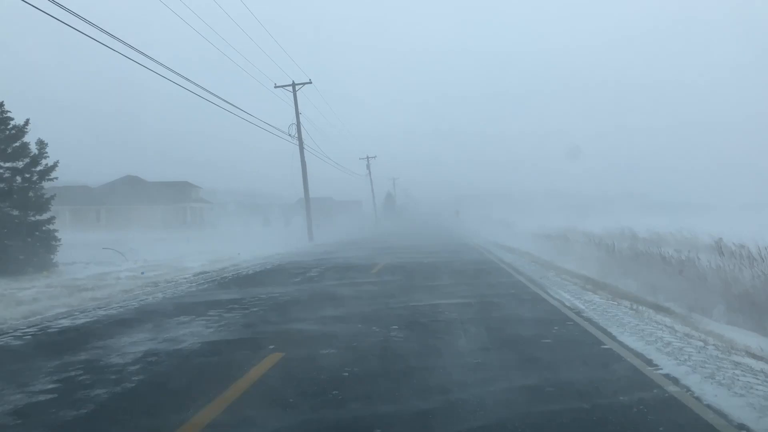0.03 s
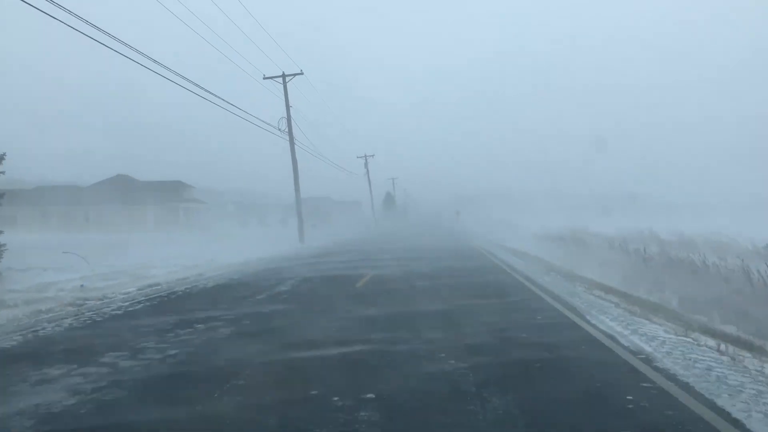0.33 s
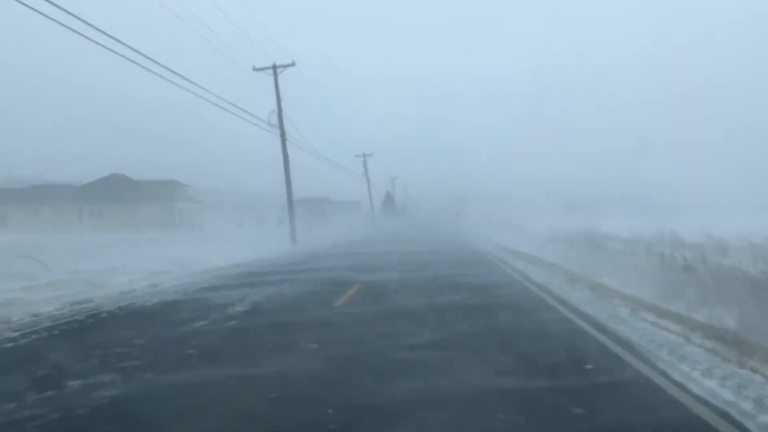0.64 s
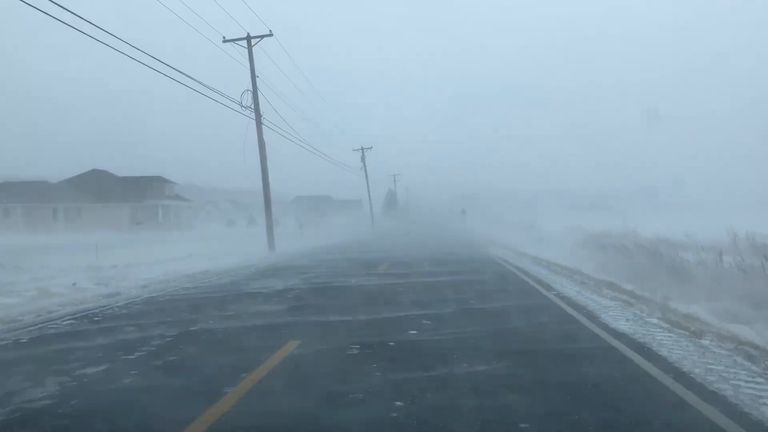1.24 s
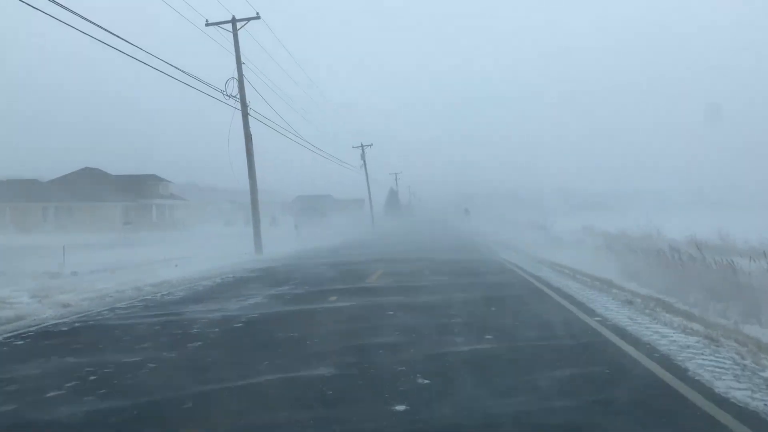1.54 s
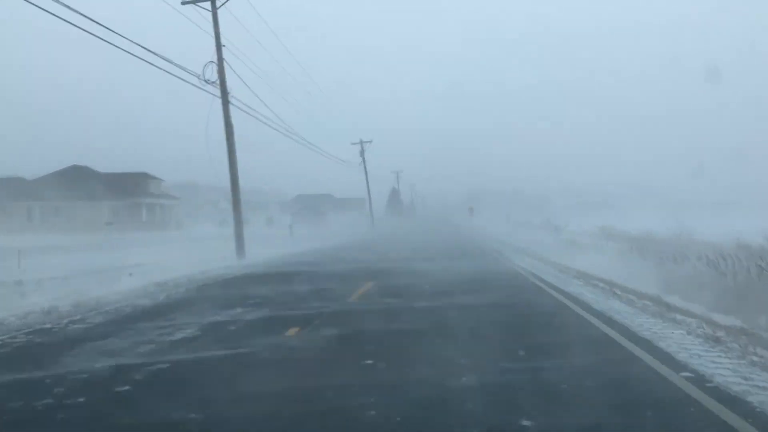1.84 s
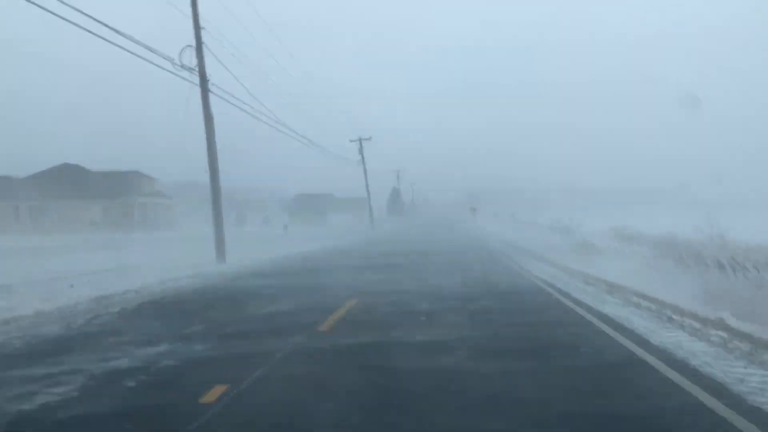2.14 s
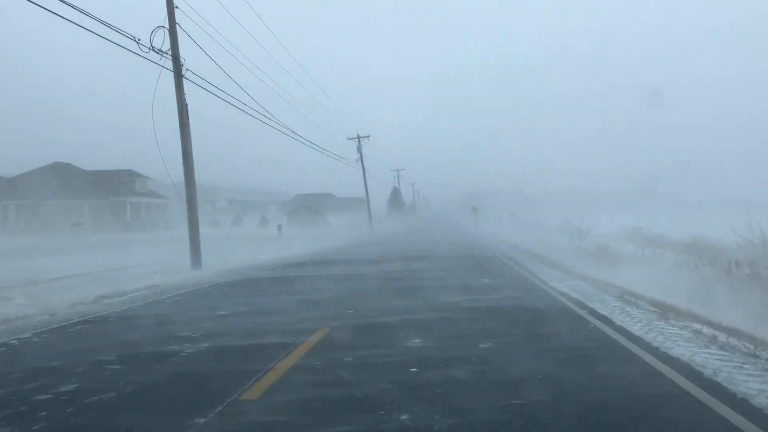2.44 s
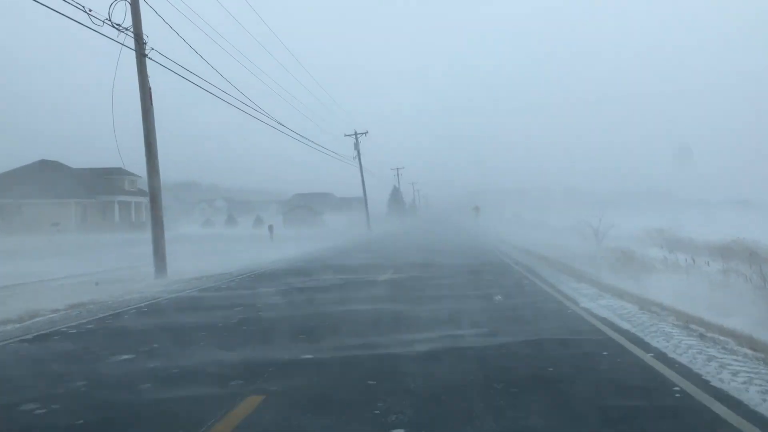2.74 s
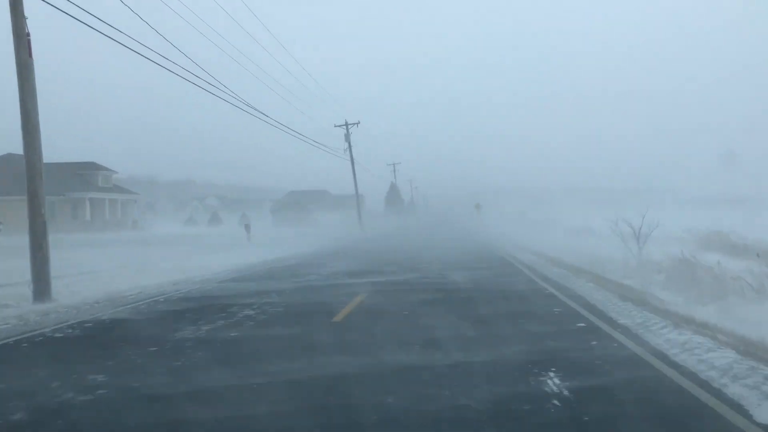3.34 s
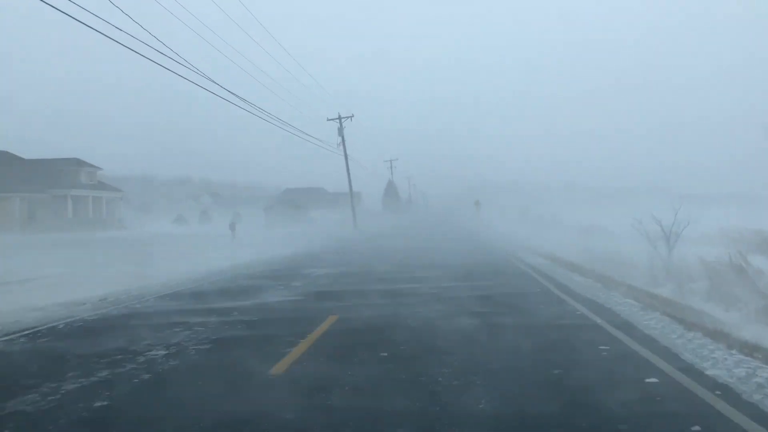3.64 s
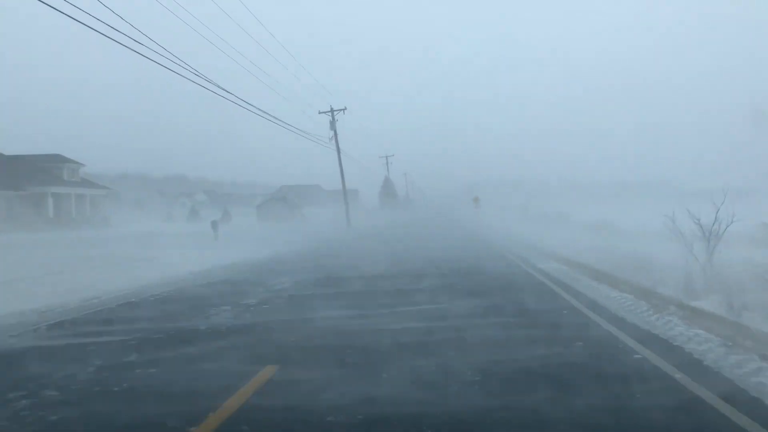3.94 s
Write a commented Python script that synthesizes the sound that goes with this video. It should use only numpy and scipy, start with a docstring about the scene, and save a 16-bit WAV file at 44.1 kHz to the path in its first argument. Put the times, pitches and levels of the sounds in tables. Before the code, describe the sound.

A steady low rumble of tyres and engine fills a moving car's cabin for four seconds, with wind hissing slightly to the right. From about 1.5 to 2.1 seconds the rumble swells and several dull thuds pass through the body. A loose part chatters in short scratchy bursts between 1.2 and 3 seconds. A faint, high whistle of air rises near 1.2 and 3 seconds.

```python
"""Car cabin on a snowy, windy road

Inside a car at steady speed, the cabin's lowest resonance booms with the engine under the tyre rumble. Air from
a vent hisses from the right, with a faint whistle of air at a gap. Midway a rough stretch swells the rumble,
ridges thud through the body, and a loose part chatters in short scratchy bursts."""
import sys
import numpy as np
from scipy import signal
from scipy.fft import rfft, irfft
from scipy.io import wavfile
from scipy.ndimage import uniform_filter1d

SR = 44100
rng = np.random.default_rng(int(sys.argv[2]) if len(sys.argv) > 2 else 0)


def wav_out(sig):
    """Save sig, one row per channel (or a flat mono array), as 16-bit PCM at SR to the path in sys.argv[1]."""
    wavfile.write(sys.argv[1], SR, np.round(np.clip(np.atleast_2d(sig).T, -1, 1) * 32767).astype(np.int16))


N = 176400
TIME_S, FREQ_HZ = np.arange(N) / SR, np.fft.rfftfreq(N, 1 / SR)
LEFT_LAG_S = .000268


# Tyre rumble in the cabin (frequency [Hz], density [dB/Hz])
RUMBLE_SPECTRUM = [(20, -70), (34, -61), (58, -35), (75, -38.5), (98, -41.5), (118, -40.5), (140, -47),
                   (160, -41.5), (200, -41.5), (235, -47), (290, -51), (350, -49.5), (470, -55),
                   (585, -54.5), (640, -62.5), (810, -61.5), (890, -65), (1400, -70), (1510, -75.5),
                   (1780, -82.5), (2600, -90), (6000, -120)]
# Tread and cabin resonances (centre [Hz], width [Hz], gain [dB])
RUMBLE_PEAKS = [(770, 56, 3), (1352, 144, 3), (1629, 84, 6.5), (1990, 70, 7)]
# Likeness at the two ears (frequency [Hz], coherence [0-1])
RUMBLE_COHERENCE = [(40, 1), (95, 0.81), (200, 0.91), (420, 0.87), (560, 0.62), (700, 0.47), (1500, 0.13)]
# Phase between the ears (frequency [Hz], left lead [rad])
RUMBLE_PHASE = [(30, -0.52), (330, 0.03), (570, -0.04), (760, -0.13), (900, -2.5), (1800, -2)]
# Road surface (time [s], roughness [dB])
ROUGHNESS = [(0, 0.8), (.7, -1.5), (1.48, 0), (1.6, 0), (1.78, 3.5), (1.95, 2), (2.02, 5.5), (2.14, 5),
             (2.2, -6), (2.3, 3), (2.6, 0), (2.8, -3), (3.0, 1), (3.3, 0), (3.6, -2.5), (4, 2)]
# Coupling of roughness to rumble level (frequency [Hz], share [0-1])
ROUGHNESS_SHARE = [(30, 0.99), (60, 0.69), (110, 0.77), (180, 0.21), (300, 0), (1500, 0.078)]

def tyre_rumble():
    """Tyres roll over the road; the bass swells where the surface is rough."""
    density_db = over_hz(RUMBLE_SPECTRUM, FREQ_HZ) + resonances_db(RUMBLE_PEAKS)
    rumble = ear_noise(density_db, over_hz(RUMBLE_COHERENCE, FREQ_HZ), over_hz(RUMBLE_PHASE, FREQ_HZ))
    return modulate(rumble, lambda hz, t: over_hz(ROUGHNESS_SHARE, hz) * over_time(ROUGHNESS, t),
                    patch_db=.93, flutter_db=.5)


def cabin_boom(centre_hz=45.4, width_hz=8.5):
    """The road shakes the cabin's lowest air resonance."""
    level_db = -23 + .26 * over_time(ROUGHNESS, TIME_S)
    return amp(level_db) * narrow_noise(N, centre_hz, width_hz)


def engine_drone(mean_hz=41.4, wander_hz=.86, rms_db=-20.5):
    """The engine hums one low, slightly wandering tone."""
    pitch_hz = mean_hz + wander_hz * drift((N,), cells=(7000,))
    return amp(rms_db) * np.sqrt(2) * np.sin(2 * np.pi * np.cumsum(pitch_hz) / SR)


# Ridges in the road (time [s], level [dB])
RIDGES = [(1.561, -19), (1.773, -16), (1.993, -9), (2.046, -11.5), (2.087, -16)]
# Low modes of the car body (frequency [Hz], level [dB], T60 [s])
BODY_MODES = [(57, -2, 0.17), (79, -2, 0.12), (120, -0.5, .08), (166, -6.5, 0.063)]

def body_thuds(size=8192):
    """Each ridge shoves the tyres and rings the body's low modes."""
    t, out = np.arange(size) / SR, np.zeros((2, N))
    thud = sum(amp(db - 60 * t / t60_s) * np.sin(2 * np.pi * hz * t) for hz, db, t60_s in BODY_MODES)
    for start_s, level_db in RIDGES:
        add(out, start_s, -amp(level_db) * np.array([thud, thud]))
    return out


# Rushing air (frequency [Hz], density [dB/Hz])
HISS_SPECTRUM = [(600, -105), (2000, -82), (2400, -78), (2900, -80), (3600, -82), (4800, -85.5),
                 (5300, -89.5), (6100, -85), (7000, -85), (8400, -93.5), (9300, -89.5), (11200, -94.5),
                 (12600, -95.5), (13800, -101), (15000, -101), (16000, -106)]
# Faint resonances (centre [Hz], width [Hz], gain [dB])
HISS_PEAKS = [(2380, 98, 3.5), (3140, 60, 4.5), (3560, 43, -1), (6700, 180, 2.5)]
# Share arriving by the direct path (frequency [Hz], coherence [0-1])
HISS_COHERENCE = [(2000, 0), (3000, 0), (3900, 0.14), (5200, 0), (6800, 0.56), (8300, 1), (9200, 1),
                  (10300, 0.67), (12500, 0.7), (13800, 1), (15000, 0)]
# Hiss envelope (time [s], gain [dB])
HISS_GAIN = [(0, 1), (.7, -1), (1.2, -0.3), (1.9, 0), (2.4, -0.8), (2.9, -1.5), (4, -1.2)]

def air_hiss():
    """Rushing air reaches the right ear first; cabin reflections ripple its spectrum."""
    ripple_db = 1.42 * drift((2, len(FREQ_HZ)), cells=(1, 300))
    density_db = over_hz(HISS_SPECTRUM, FREQ_HZ) + ripple_db + resonances_db(HISS_PEAKS)
    hiss = ear_noise(density_db, over_hz(HISS_COHERENCE, FREQ_HZ), -2 * np.pi * FREQ_HZ * LEFT_LAG_S)
    return modulate(hiss, lambda hz, t: over_time(HISS_GAIN, t), patch_db=1.1, flutter_db=.28)


# Chatter (time [s], hold [s], gain [dB], tilt [dB/octave], ring [Hz], ring width [Hz], ring gain [dB])
RATTLE_BURSTS = [(1.197, .009, -13, 8, 11000, 900, 3), (1.275, 0.011, -11, 0, 4900, 460, 3),
                 (1.558, 0.018, -6.5, -2, 2700, 900, 4.5), (1.644, .012, -16, 6, 14500, 900, 4),
                 (1.693, .007, -10, 6, 11000, 900, 3), (1.731, 0.012, -4, 2, 11500, 1200, 3),
                 (1.863, 0.009, -1.5, 3.8, 2150, 560, 15), (1.889, 0.017, -6, 1, 4400, 900, 2),
                 (1.919, 0.0073, -3.5, 1.5, 4400, 900, 1), (1.931, 0.0018, 3.5, 3.5, 13500, 1500, 2),
                 (1.94, 0.012, -14, -2, 4900, 460, 2), (2.132, 0.011, -6.5, -2, 4970, 460, 8),
                 (2.224, 0.0067, -12.5, -1, 3400, 600, 12), (2.276, .01, -12, 2, 11000, 900, 4),
                 (2.346, 0.0057, -8, 5, 11200, 900, 6), (2.435, 0.0074, -8.5, 1, 4400, 1100, 11.5),
                 (2.526, .018, -13, -1, 4000, 460, 2), (2.59, 0.009, -4.5, 5.5, 6500, 900, 5),
                 (3.009, 0.013, -7, -3.5, 2600, 900, 1.5), (3.025, .005, -8, -1, 3000, 1200, 8)]
# Base colour of the loose part (frequency [Hz], density [dB/Hz])
RATTLE_SPECTRUM = [(900, -100), (1800, -64.5), (2700, -66), (3700, -77), (4600, -72.5), (5600, -72.5),
                   (8200, -81.5), (10500, -82), (13000, -88.5), (16000, -97)]

def loose_rattle(contacts_per_s=3300, spread_db=10, attack_s=.001, decay_s=.0039, size=4096):
    """A loose part makes clusters of tiny contacts, heard directly and through the cabin's short echo."""
    echo_gain, echo_t60_s = amp(-5.5), .07
    tilt_floor_hz, tilt_pivot_hz = 1800, 5450
    t, hz, out = np.arange(size) / SR, np.fft.rfftfreq(size, 1 / SR), np.zeros((2, N))
    tail = unit(rng.standard_normal((2, size)) * amp(-60 * t / echo_t60_s))
    echo = rfft(tail) / np.sqrt(size)
    direct = np.exp(-2j * np.pi * hz * np.array([[LEFT_LAG_S], [0]]))
    path = (direct + echo_gain * echo) / np.hypot(1, echo_gain)
    octaves = np.log2(np.maximum(hz, tilt_floor_hz) / tilt_pivot_hz)
    for start_s, hold_s, gain_db, tilt_db, ring_hz, width_hz, ring_db in RATTLE_BURSTS:
        chance, force, polarity = rng.random((3, size))
        contacts = unit((chance < contacts_per_s / SR) * np.sign(polarity - .5) * amp(spread_db * force))
        envelope = np.minimum(t / attack_s, 1) * np.exp(-np.maximum(t - hold_s, 0) / decay_s)
        shape_db = tilt_db * octaves + ring_db * peak(hz, ring_hz, width_hz)
        colour = amp(over_hz(RATTLE_SPECTRUM, hz) + gain_db + shape_db) * np.sqrt(SR / 2)
        add(out, start_s, irfft(rfft(contacts * envelope) * colour * path, size))
    return out


# Whistle envelope (time [s], level [dB])
WHISTLE_ENVELOPE = [(0, -74), (1.03, -72), (1.25, -61), (1.5, -65), (2.3, -66), (2.9, -65), (3.05, -58),
                    (3.25, -65), (4, -63)]

def gap_whistle(centre_hz=4965, width_hz=62, waver_db=3):
    """Air at a gap gives a faint, breathy whistle that comes and goes with the wind."""
    tone = narrow_noise((2, N), centre_hz, width_hz)
    return tone * amp(over_time(WHISTLE_ENVELOPE, TIME_S) + waver_db * drift((N,), cells=(3500,)))


def amp(db):
    """Decibels to gain."""
    return 10 ** (np.asarray(db) / 20)


def unit(x):
    """Scales to unit rms."""
    return x / np.sqrt(np.mean(x ** 2) + 1e-20)


def over_hz(points, hz):
    """Reads a table on a log frequency axis."""
    knots_hz, values = np.transpose(points)
    return np.interp(np.log(hz + 1), np.log(knots_hz + 1), values)


def over_time(points, t):
    """Reads a control curve."""
    return np.interp(t, *np.transpose(points))


def add(mix, start_s, sound):
    """Mixes in a stereo sound."""
    part = mix[:, round(start_s * SR):][:, :sound.shape[1]]
    part += sound[:, :part.shape[1]]


def peak(hz, centre_hz, width_hz):
    """Resonance curve, one at its centre."""
    return 1 / (1 + ((hz - centre_hz) / (width_hz / 2)) ** 2)


def resonances_db(peaks):
    """Summed gain of resonances at each frequency."""
    return sum(db * peak(FREQ_HZ, centre_hz, width_hz) for centre_hz, width_hz, db in peaks)


def narrow_noise(shape, centre_hz, width_hz):
    """Unit-rms noise through one resonance."""
    return unit(irfft(rfft(rng.standard_normal(shape)) * peak(FREQ_HZ, centre_hz, width_hz), N))


def drift(shape, cells):
    """Unit-rms noise, smoothed over the given cells along each axis."""
    x = rng.standard_normal(shape)
    for axis, span in enumerate(cells):
        x = uniform_filter1d(uniform_filter1d(x, span, axis), span, axis)
    return unit(x)


def ear_noise(density_db, coherence, left_lead_rad):
    """Stereo noise of given density, coherence and phase at each frequency."""
    common, separate = rfft(rng.standard_normal((2, N)))
    coherence = np.clip(coherence, 0, 1)
    left = common * np.exp(1j * left_lead_rad)
    right = coherence * common + np.sqrt(1 - coherence ** 2) * separate
    return irfft(np.array([left, right]) * amp(density_db), N) * np.sqrt(SR / 2)


def modulate(noise, gain_db, patch_db, flutter_db):
    """Applies gain_db(hz, t), drifting spectral patches and a flutter common to all bands."""
    hz, t, bands = signal.stft(noise, SR, nperseg=1024, noverlap=768)
    patches = drift((len(t), len(hz)), cells=(9, 6)).T
    flutter = drift((len(t),), cells=(8,))
    bands = bands * amp(gain_db(hz[:, None], t) + patch_db * patches + flutter_db * flutter)
    return signal.istft(bands, SR, nperseg=1024, noverlap=768)[1][:, :N]


# Cabin colour between the ears (frequency [Hz], left over right [dB])
CABIN_BALANCE = [(60, 0.2), (220, -0.7), (350, 2), (580, 2), (680, 0), (1100, 0.5), (1500, 2.5), (2300, 1),
                 (3200, 0.9), (9000, -0.5)]

def scene():
    """All sources, coloured a little differently at each ear by the cabin."""
    mix = tyre_rumble() + cabin_boom() + engine_drone() + body_thuds()
    mix += air_hiss() + gap_whistle() + loose_rattle()
    lean_db = over_hz(CABIN_BALANCE, FREQ_HZ) / 2
    return irfft(rfft(mix) * amp([lean_db, -lean_db]), N)


def record(dry, low_cut_hz=33, high_cut_hz=15800, open_s=.0797, fade_s=.001):
    """The microphone sheds the deepest bass, opens after a moment and limits the treble."""
    highpass = signal.butter(4, low_cut_hz, "high", fs=SR, output="sos")
    lowpass = signal.firwin(511, high_cut_hz, window=("kaiser", 9), fs=SR)
    gate = np.clip((TIME_S - open_s) / fade_s, 0, 1)
    return signal.oaconvolve(signal.sosfilt(highpass, dry) * gate, lowpass[None], "same")


dry = scene()
out = record(dry)
wav_out(out)
```